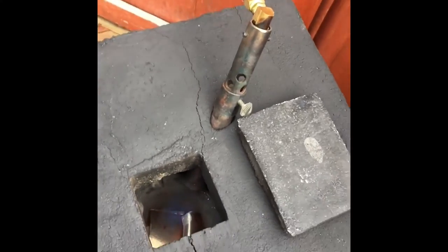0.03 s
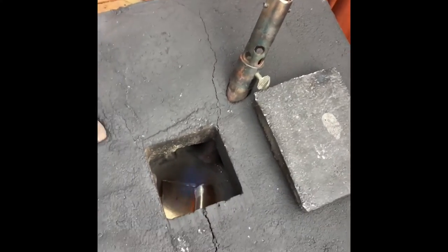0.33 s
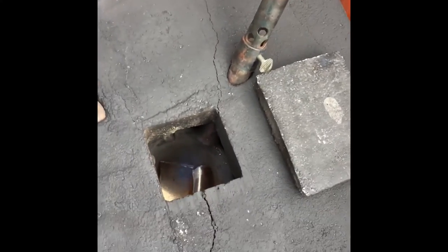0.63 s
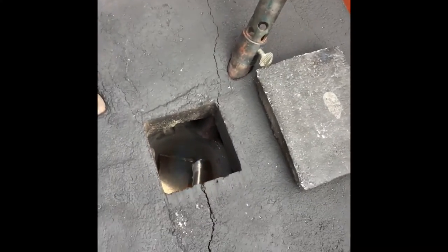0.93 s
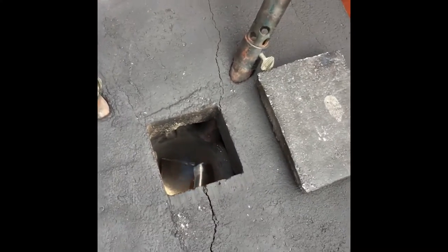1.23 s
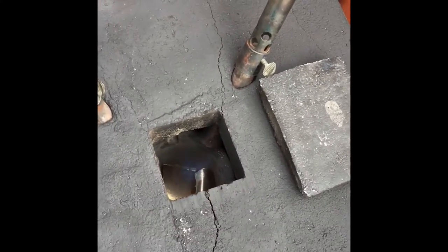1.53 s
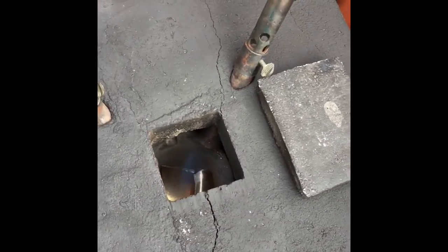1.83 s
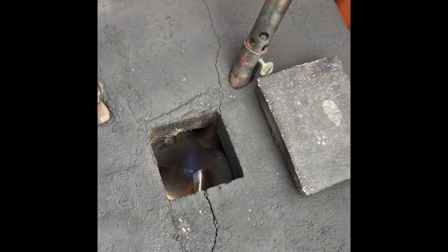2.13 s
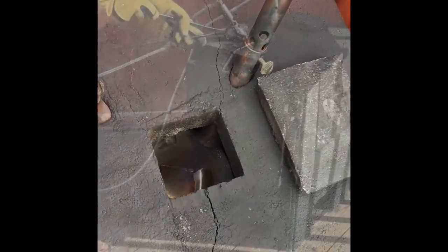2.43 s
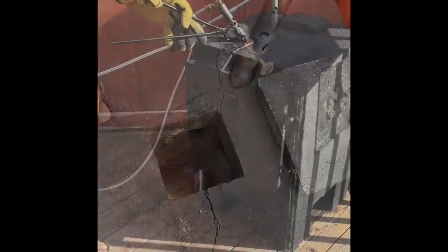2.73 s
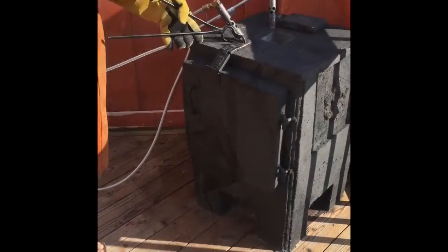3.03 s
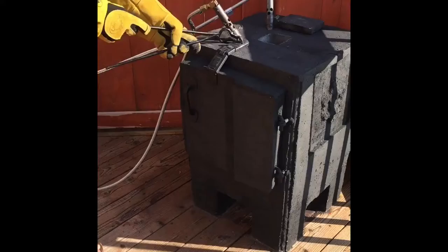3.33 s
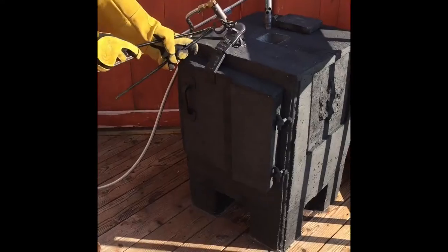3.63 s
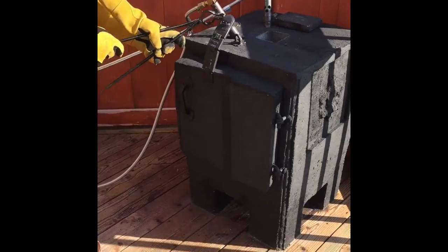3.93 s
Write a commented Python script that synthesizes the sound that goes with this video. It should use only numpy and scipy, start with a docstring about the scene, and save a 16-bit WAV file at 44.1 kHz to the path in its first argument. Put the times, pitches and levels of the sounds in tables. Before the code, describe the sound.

Close, low roar of a gas furnace burner, sinking to a rumble with a tong clank.

```python
"""A gas burner roars into a small foundry furnace, outdoors and close to the microphone. The flame
drives the chamber's low resonance, the burner tube rings with the gas flow, and the flame's hiss
swells and sinks. After about three seconds the roar dissolves into the quiet rumble of the furnace
from further off, where steel tongs squeak faintly, clank on the lid, scrape and touch it again."""
import sys
import numpy as np
from scipy import signal
from scipy.fft import rfft, irfft, next_fast_len
from scipy.io import wavfile
from scipy.ndimage import uniform_filter1d, map_coordinates

SR = 44100
rng = np.random.default_rng(int(sys.argv[2]) if len(sys.argv) > 2 else 0)


def persist_wave(psi):
    """Save psi, clipped to +-1, as 16-bit WAV."""
    counts = np.round(np.clip(psi, -1, 1) * 32767).astype(np.int16)
    wavfile.write(sys.argv[1], SR, np.atleast_2d(counts).T)


N = 176400
TIME = np.arange(N) / SR


def amp(db):
    """Decibels to gain."""
    return 10 ** (np.asarray(db) / 20)


def unit(x):
    """x scaled to rms 1."""
    return x / np.sqrt(np.mean(x ** 2) + 1e-20)


def curve(rows):
    """(seconds, value) rows joined by straight lines."""
    return np.interp(TIME, *np.transpose(rows))


def surges(rows, half_s):
    """A dB curve of brief bell-shaped rises at (seconds, dB) rows."""
    return sum(db * np.exp(-((TIME - s) / half_s) ** 2) for s, db in rows)


def wobble(per_s):
    """A smooth random curve with per_s knots a second."""
    return map_coordinates(rng.standard_normal(int(N * per_s / SR) + 4), [TIME * per_s])


def decay(t, t60):
    """Silent before t = 0, then dying by 60 dB in t60 seconds."""
    return (t >= 0) * np.exp(-np.log(1000) * np.maximum(t, 0) / t60)


def filtered(x, response):
    """x through a filter whose gain is response(Hz)."""
    size = next_fast_len(N + SR // 2)
    return irfft(rfft(x, size) * response(np.fft.rfftfreq(size, 1 / SR)), size)[:N]


def coloured(x, spectrum):
    """x shaped by (Hz, dB) rows, rms 1."""
    hz, db = np.transpose(spectrum)
    return unit(filtered(x, lambda f: amp(np.interp(np.log(f + 1), np.log(hz), db))))


def noise(spectrum):
    """Noise with the given spectrum, rms 1."""
    return coloured(rng.standard_normal(N), spectrum)


def resonating(peaks):
    """Turbulence ringing in steep-sided (Hz, width in Hz, dB) resonances, rms 1."""
    def gain(f):
        return np.sqrt(sum((amp(db) / (1 + ((f - hz) / width) ** 2)) ** 2 for hz, width, db in peaks))
    return unit(filtered(rng.standard_normal(N), gain))


def noisy_note(hz, width_hz):
    """Noise ringing in a single resonance, rms 1."""
    return resonating([(hz, width_hz, 0)])


def steadied(x, samples):
    """x with its slow swells evened out, as in a self-sustained oscillation; rms 1."""
    return unit(x / np.sqrt(np.abs(uniform_filter1d(x ** 2, samples)) + 1e-9))


def patchy(x, depth_db=0.9):
    """x with shifting stronger and weaker patches in its spectrum, rms 1."""
    spectra = signal.stft(x, nperseg=512)[2]
    patches = uniform_filter1d(rng.standard_normal(spectra.shape), size=4, axis=0)  # across frequency
    patches = uniform_filter1d(patches, size=45, axis=1)  # across time
    return unit(signal.istft(spectra * amp(depth_db * unit(patches)), nperseg=512)[1][:N])


# The flame, close to the microphone. Each row: frequency in Hz, relative level in dB.
FLAME_SPECTRUM = [(20, -52), (33, -43), (50, -16), (75, 0), (125, -5.5), (180, -6), (245, -19),
                  (280, -21.5), (320, -13.5), (560, -15.5), (780, -22.5), (1120, -24.5), (1240, -27),
                  (1400, -23.5), (1780, -25), (1980, -27.5), (2500, -34.5), (3000, -35), (4000, -62),
                  (5500, -46.5), (15000, -61.5)]
# The chamber's higher resonances. Each row: frequency in Hz, width in Hz, relative level in dB.
CHAMBER_MODES = [(994, 52, 1.5), (1159, 13, 2.5), (1376, 91, -0.5), (1616, 58, 4.5), (1742, 35, 3),
                 (1910, 31, -2)]
# The course of the roar. Each row: time in seconds, relative level in dB.
FLAME_LEVEL = [(0.0, -26), (0.06, -29.5), (0.14, -26), (0.42, -24), (0.52, -26.5), (0.88, -26.5),
               (0.95, -29.5), (0.99, -27.5), (1.85, -27), (1.93, -28), (1.97, -30), (2.35, -26),
               (2.45, -26.5), (3.05, -39), (3.18, -50.5)]
# Brief puffs of the flame. Each row: time in seconds, rise in dB.
PUFFS = [(0.108, 3), (1.103, 4.5), (1.907, 3.5), (2.366, 4), (2.89, 1.5)]


def flame(flutter_db):
    """The fluttering flame roars through the furnace chamber and puffs now and then."""
    roar = amp(8) * steadied(noise(FLAME_SPECTRUM), samples=9000)
    chamber_ring = amp(-6.5) * resonating(CHAMBER_MODES)
    level_db = curve(FLAME_LEVEL) + surges(PUFFS, half_s=0.015) + flutter_db
    return amp(level_db) * (roar + chamber_ring)


# The boom, from beside the furnace. Each row: time in seconds, relative level in dB.
BOOM_LEVEL = [(0.0, -20), (0.26, -18.5), (0.28, -29), (0.34, -12.5), (0.35, -22), (0.48, -11.5),
              (0.52, -38), (0.6, -12.5), (0.81, -14), (0.84, -39), (0.87, -11.5), (0.95, -13),
              (0.98, -23.5), (1.26, -10), (1.34, -22), (1.38, -12.5), (1.43, -19.5), (1.54, -12),
              (1.68, -25.5), (1.91, -10.5), (1.97, -22), (2.05, -7), (2.09, -24), (2.12, -18.5),
              (2.18, -13.5), (2.23, -24.5), (2.28, -15.5), (2.31, -29), (2.36, -20), (2.42, -38),
              (2.46, -15), (2.62, -27), (2.74, -16), (2.83, -31), (2.87, -23), (3.18, -39)]
# The hollow note above it. Each row: time in seconds, relative level in dB.
HOLLOW_LEVEL = [(0.0, -37), (0.26, -25), (1.47, -34), (1.66, -24.5), (1.71, -43), (1.77, -21.5),
                (2.16, -35), (2.66, -31), (3.13, -43), (3.18, -62)]


def chamber(boom_hz=120.36, waver_hz=6.5, hollow_hz=379.2):
    """The flame keeps the chamber's two lowest notes going: a wavering boom and a hollow hum."""
    pitch = boom_hz + waver_hz * wobble(per_s=20)
    drone = np.sqrt(2) * np.sin(2 * np.pi * np.cumsum(pitch) / SR)
    boom = steadied(drone + amp(-1.5) * noisy_note(boom_hz, width_hz=19.3), samples=1500)
    hollow = steadied(noisy_note(hollow_hz, width_hz=10.6), samples=3500)
    return amp(curve(BOOM_LEVEL) + 0.5) * boom + amp(curve(HOLLOW_LEVEL) - 0.5) * hollow


# The burner tube's resonances. Each row: frequency in Hz, width in Hz, relative peak height in dB.
TUBE_MODES = [(2182, 110, 3), (2258, 40, 5.5), (2369, 26, 6), (2442, 28, 3.5), (2530, 150, -1),
              (2960, 79, -6.5), (3290, 35, -6.5)]
# Its ring at close range. Each row: time in seconds, relative level in dB.
TUBE_LEVEL = [(0.0, -25), (0.12, -28.5), (0.2, -25.5), (0.3, -27), (0.35, -30), (0.53, -22.5), (0.75, -29),
              (0.95, -31.5), (1.03, -27), (1.18, -24.5), (1.47, -29), (1.53, -33.5), (1.73, -22.5),
              (1.89, -29.5), (2.12, -29), (2.33, -26), (2.41, -26.5), (2.45, -29.5), (2.49, -25),
              (2.63, -29), (2.67, -37), (2.72, -32.5), (3.06, -39.5), (3.18, -49)]


def burner_tube():
    """The gas flow rings the tube, whose resonances each swell and sink so that the tone wavers."""
    ring = sum(np.sqrt(width) * amp(db + 2 * wobble(per_s=9)) * noisy_note(hz, width)
               for hz, width, db in TUBE_MODES)
    return amp(curve(TUBE_LEVEL) - 2) * steadied(ring, samples=5000)


# Gas in the tube, close up. Each row: frequency in Hz, relative level in dB.
RUSH_SPECTRUM = [(1500, -38), (2700, -4), (3300, 3), (4600, -3.5), (5300, -3.5), (6200, -12), (7500, -17),
                 (11000, -44)]
# The course of the rush. Each row: time in seconds, relative level in dB.
RUSH_LEVEL = [(0.0, -38.5), (0.16, -36.5), (0.19, -30.5), (0.21, -35), (0.44, -37), (0.62, -32.5),
              (0.73, -39), (0.78, -35), (0.89, -43), (1.08, -37), (1.3, -33.5), (1.5, -39), (1.65, -37),
              (1.73, -31.5), (1.83, -38.5), (1.98, -42), (2.2, -38), (2.31, -33), (2.78, -45.5),
              (2.9, -43.5), (3.18, -57)]


def gas_rush():
    """Gas rushes through the tube with a faint, fitful whistle."""
    whistle = amp(-10 + 1.8 * wobble(per_s=9)) * noisy_note(hz=4545, width_hz=75)
    return amp(curve(RUSH_LEVEL) - 1) * (patchy(noise(RUSH_SPECTRUM)) + whistle)


# The flame's hiss, close up. Each row: frequency in Hz, relative level in dB.
HISS_SPECTRUM = [(1000, -27), (2600, -32), (4500, 3), (5500, -3.5), (6800, 2.5), (7500, -2), (8500, 4.5),
                 (9700, 1.5), (10400, -3.5), (11200, 3), (12500, 0.5), (15300, 0)]
# Its swells and lulls. Each row: time in seconds, relative level in dB.
HISS_LEVEL = [(0.0, -37), (0.16, -36.5), (0.2, -33), (0.29, -40.5), (0.37, -37.5), (0.55, -38),
              (0.66, -33.5), (0.71, -36), (0.79, -38.5), (0.9, -39.5), (1.06, -42), (1.13, -37),
              (1.22, -40), (1.31, -31.5), (1.58, -45.5), (1.62, -38), (1.72, -32), (1.76, -36.5),
              (2.02, -46), (2.08, -40.5), (2.23, -44), (2.3, -34.5), (2.46, -40.5), (2.55, -35.5),
              (2.69, -44), (2.9, -48), (3.18, -59)]
# Sharp spurts of the gas jet. Each row: time in seconds, rise of the hiss in dB.
SPURTS = [(0.196, 4.5), (0.503, 5), (0.66, 2), (1.166, 4), (1.295, 2.5), (1.725, 2), (2.48, 4.5)]


def flame_hiss(spits_per_s=670, spread_db=18):
    """The flame hisses with a fine crackle, louder whenever the gas jet spurts."""
    spits = (rng.random(N) < spits_per_s / SR) * rng.choice([-1, 1], N)
    spits = spits * amp(spread_db * np.minimum(rng.exponential(size=N), 4))  # a few stand far out
    crackle = amp(-14.5) * coloured(spits, HISS_SPECTRUM)
    level_db = curve(HISS_LEVEL) + surges(SPURTS, half_s=0.0095) + 0.5
    return amp(level_db) * patchy(noise(HISS_SPECTRUM) + crackle)


def burner():
    """At close range, flame and gas jet share one flutter over the notes of the chamber."""
    flutter = wobble(per_s=49)
    roar = flame(flutter_db=1.5 * flutter) + chamber()
    gas_jet = burner_tube() + gas_rush() + flame_hiss()
    return roar + amp(0.8 * flutter) * gas_jet


# The furnace, further from the microphone. Each row: frequency in Hz, relative level in dB.
FAR_SPECTRUM = [(25, -26), (40, -10), (55, 2.5), (85, -5.5), (110, -4.5), (150, -9), (230, -9), (310, -19),
                (600, -17.5), (850, -22), (1150, -22.5), (1500, -30), (1850, -27), (2600, -35),
                (4000, -38.5), (5500, -45.5), (7500, -51), (11000, -52.5), (15000, -57)]
# Chamber and tube at that distance. Each row: frequency in Hz, width in Hz, level in dB.
FAR_TONES = [(107.7, 7.4, -40.5), (2030, 33, -57)]
FADE_START_S, FADE_END_S = 3.12, 3.24  # the far furnace fades in


def far_furnace():
    """A dull, slowly sinking rumble with the chamber's steady hum and a thin ring of the tube."""
    level_db = -41 - 1.5 * (TIME - FADE_END_S) + 0.7 * wobble(per_s=24.96)
    rumble = amp(level_db) * steadied(noise(FAR_SPECTRUM), samples=7000)
    tones = sum(amp(db) * steadied(noisy_note(hz, width), samples=2500) for hz, width, db in FAR_TONES)
    return rumble + tones


# Faint squeaks of the tongs, over at the furnace. Each row: start in seconds, attack in seconds,
# release in seconds, pitch in Hz, glide in Hz per second, level in dB.
SQUEAKS = [(3.13, 0.22, 0.11, 3600, -420, -55.5), (3.544, 0.041, 0.23, 4155, -80.5, -51)]


def tong_squeaks(waver_hz=20.4, rough_db=3.5):
    """Sliding steel sings on one wavering note that swells, sinks in pitch and dies away."""
    out = np.zeros(N)
    for start, attack, release, hz, glide, db in SQUEAKS:
        t = TIME - start
        pitch = hz + glide * t + waver_hz * wobble(per_s=110)
        swell = np.interp(t, [0, attack, attack + release], [0, 1, 0])
        roughness = unit(amp(rough_db * wobble(per_s=76)))
        out += amp(db) * swell * roughness * np.sin(2 * np.pi * np.cumsum(pitch) / SR)
    return out


# The tongs meet the lid, away from the microphone. Each row: start in seconds, relative level in dB.
CONTACTS = [(3.507, -42), (3.511, -30.5), (3.516, -37), (3.885, -45.5)]
# The crack of a contact. Each row: frequency in Hz, relative level in dB.
CRACK_SPECTRUM = [(80, -10), (200, 14), (700, -5), (1700, 3.5), (3400, -4), (5500, -5), (7500, -17),
                  (9200, -7), (10800, -23), (13500, -11), (16000, -14)]
# Modes of tongs and lid. Each row: frequency in Hz, relative level in dB, seconds to fall by 60 dB.
STEEL_MODES = [(700, 5, 0.025), (1555, -2.5, 0.065), (1900, -4, .1), (2520, -1, 0.08), (2740, -9, .08),
               (3350, -4, 0.061), (4270, -16, .07), (5400, -6, 0.078), (6850, -19, 0.2), (8161, -19, .08),
               (13460, -22, .16)]


def tong_clanks():
    """Each contact of steel on the lid cracks, rattles and rings briefly."""
    out = np.zeros(N)
    for start, db in CONTACTS:
        t = TIME - start
        crack, rattle = decay(t, t60=0.015), amp(-14) * decay(t, t60=0.27)
        clatter = noise(CRACK_SPECTRUM) * (crack + rattle)
        ring = sum(amp(mode_db + rng.normal(0, 1.4)) * np.sin(2 * np.pi * hz * t) * decay(t, t60)
                   for hz, mode_db, t60 in STEEL_MODES)
        out += amp(db) * (clatter + amp(-7.5) * ring)
    return out


def lid_thud(start_s=3.5315, hz=107, rise_s=0.023):
    """The heavy lid answers the hardest contact with a low thud."""
    t = np.maximum(TIME - start_s, 0)
    envelope = (1 - np.exp(-t / rise_s)) * decay(t, t60=0.059)
    return amp(-4) * envelope * np.sin(2 * np.pi * hz * t)


# Soft scrapes across the lid, faint at this distance. Each row: middle in seconds,
# half length in seconds, frequency in Hz, width in Hz, level in dB.
SCRAPES = [(3.643, 0.013, 3900, 600, -73), (3.76, 0.016, 4280, 800, -61), (3.787, .012, 1780, 600, -49),
           (3.837, 0.036, 2350, 200, -58), (3.892, 0.014, 3600, 1500, -54),
           (3.914, 0.076, 1170, 130, -54.5)]


def tong_scrapes(rough_db=2.4):
    """The tongs drag over the lid in short, uneven swells of friction, each around one resonance."""
    out = np.zeros(N)
    for middle, half_s, hz, width, db in SCRAPES:
        swell = np.exp(-((TIME - middle) / half_s) ** 2)
        out += amp(db + rough_db * wobble(per_s=120)) * swell * noisy_note(hz, width)
    return out


def scene():
    """The close roar sinks and ends as the far furnace fades in and the tongs go to work; mono."""
    near = np.interp(TIME, [FADE_END_S - 0.056, FADE_END_S], [1, 0])
    far = np.interp(TIME, [FADE_START_S, FADE_END_S], [0, 1])
    furnace = near * burner() + far * far_furnace()
    tongs = tong_clanks() + lid_thud() + tong_squeaks() + tong_scrapes()
    return (furnace + tongs)[None]


LOW_CUT_HZ, TOP_HZ = 28, 15330


def record(dry):
    """The recorder rolls off the deepest bass and keeps nothing above its band limit."""
    band = lambda hz: (hz < TOP_HZ) / np.sqrt(1 + (LOW_CUT_HZ / (hz + 1)) ** 8)
    return np.array([filtered(x, band) for x in dry])


dry = scene()
out = record(dry)
persist_wave(out)
```